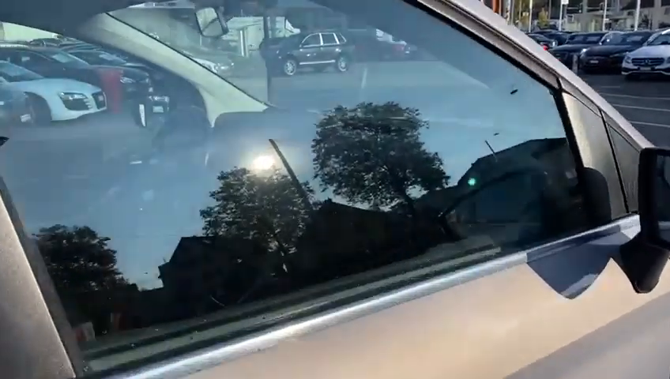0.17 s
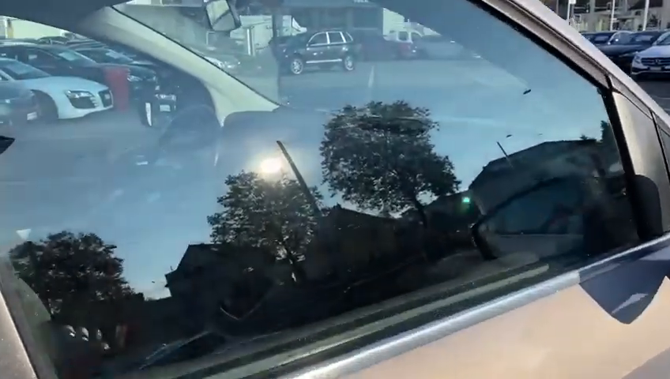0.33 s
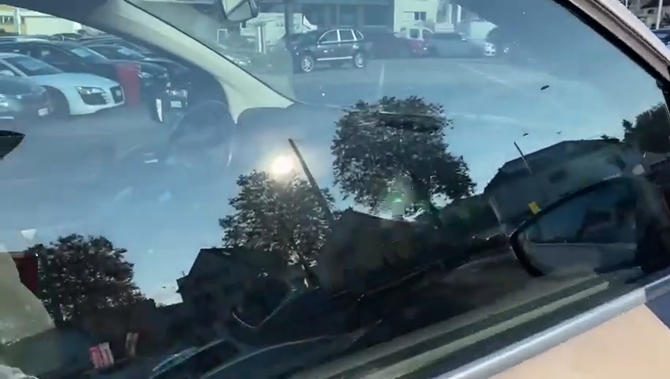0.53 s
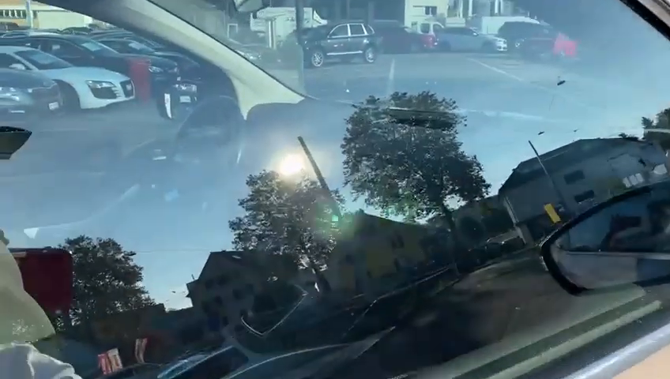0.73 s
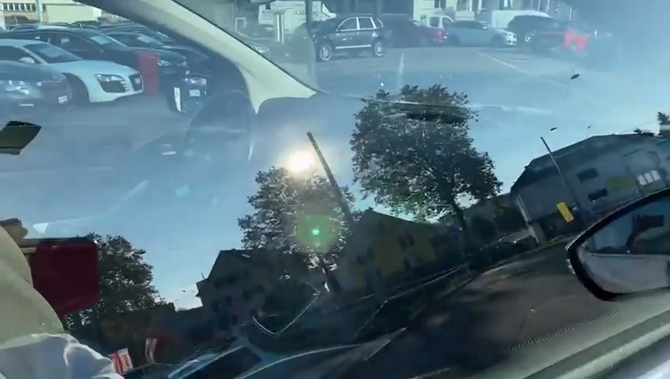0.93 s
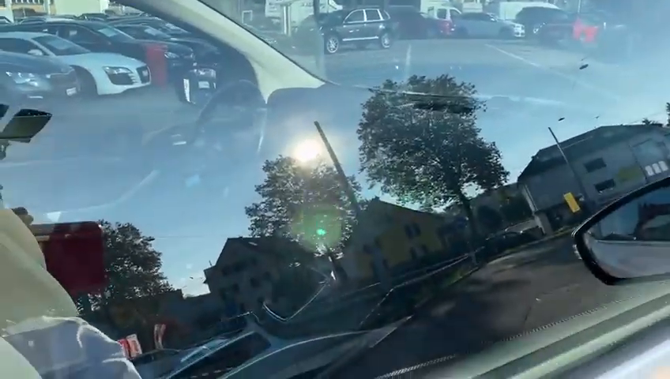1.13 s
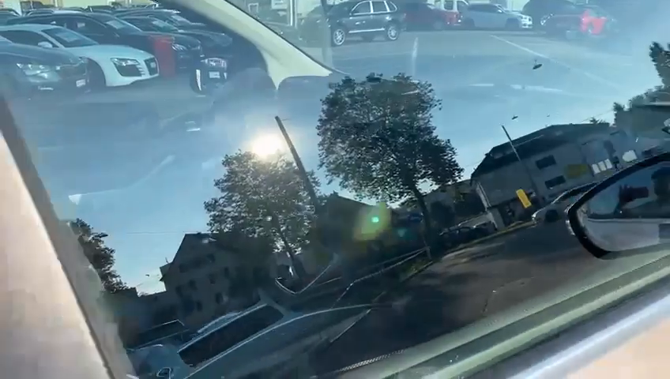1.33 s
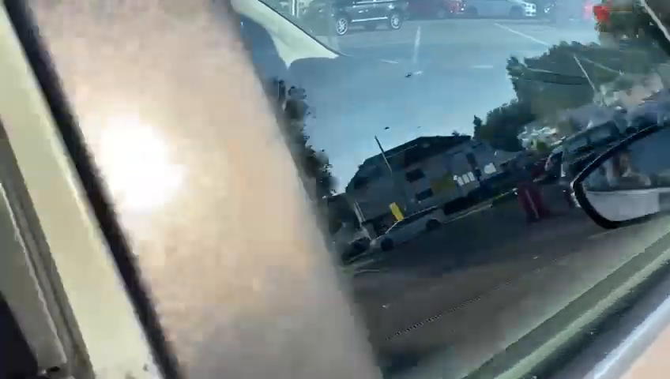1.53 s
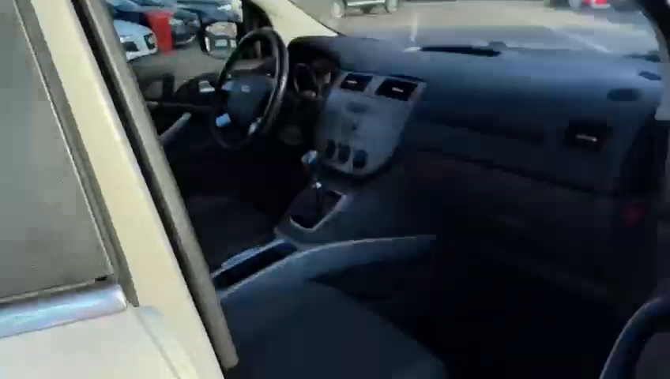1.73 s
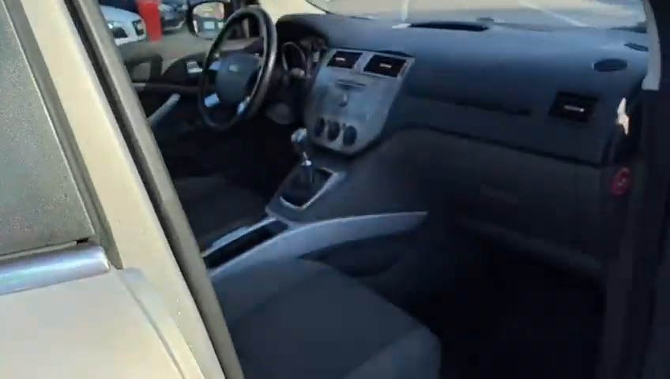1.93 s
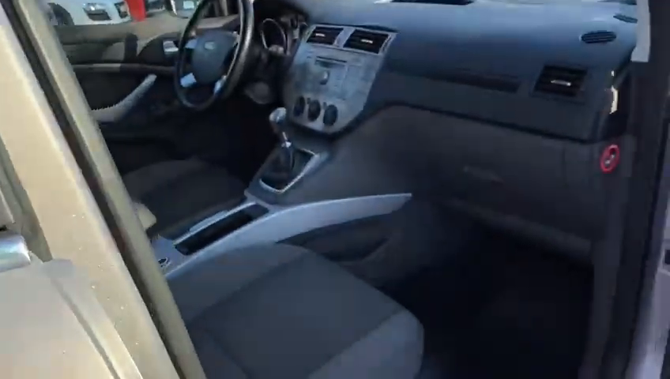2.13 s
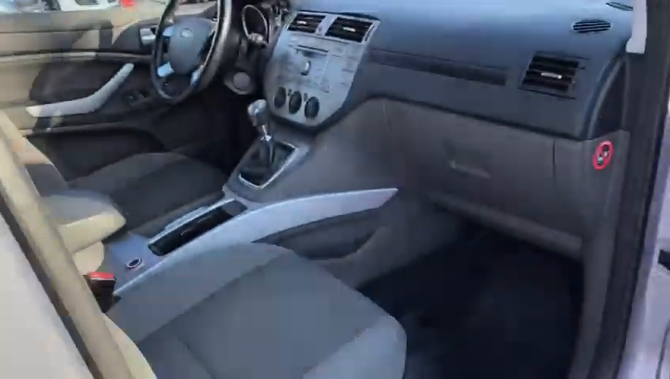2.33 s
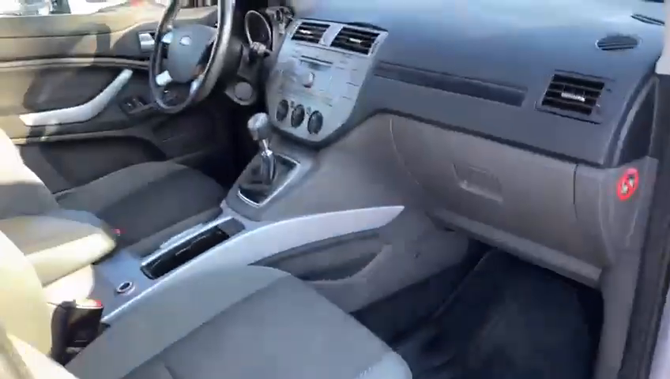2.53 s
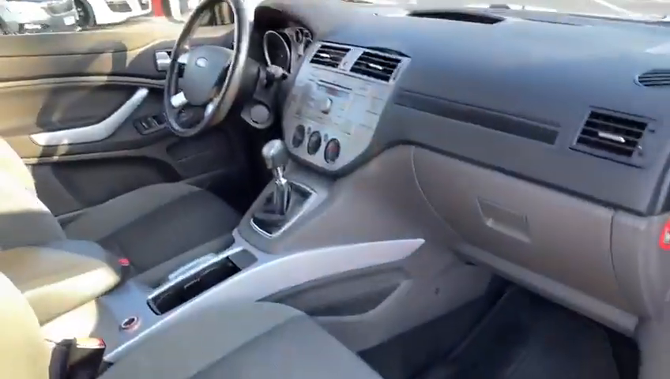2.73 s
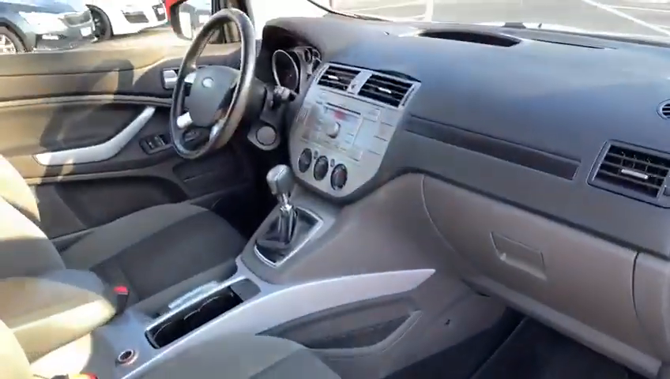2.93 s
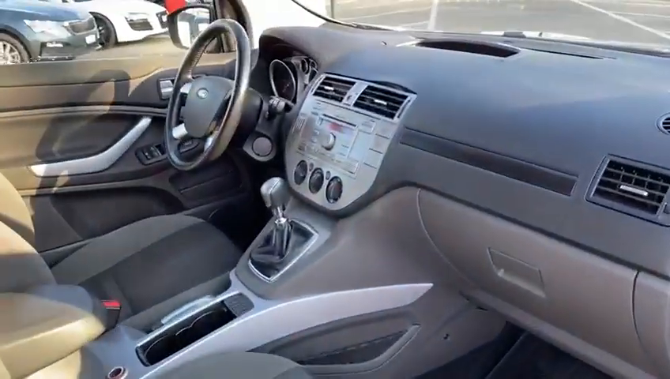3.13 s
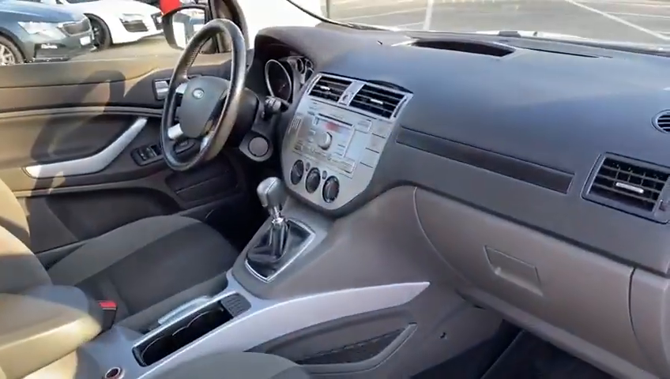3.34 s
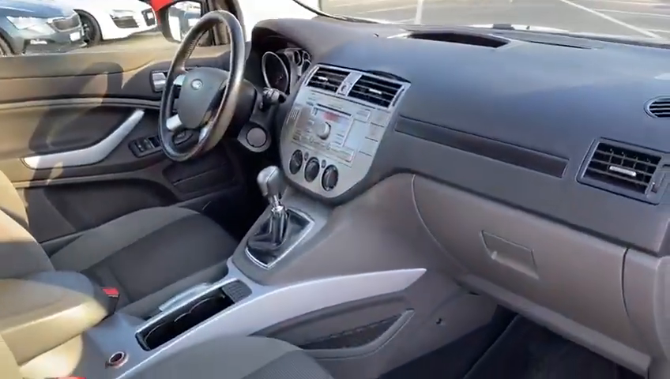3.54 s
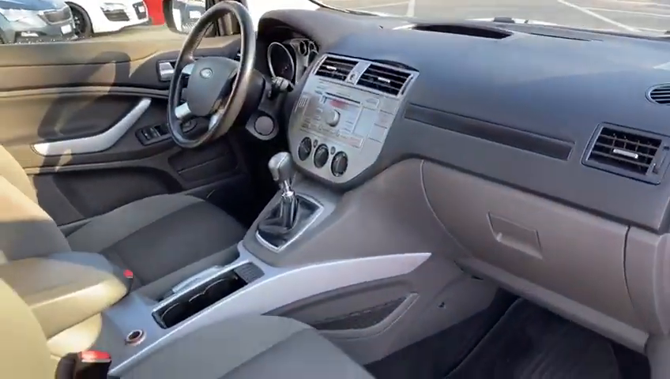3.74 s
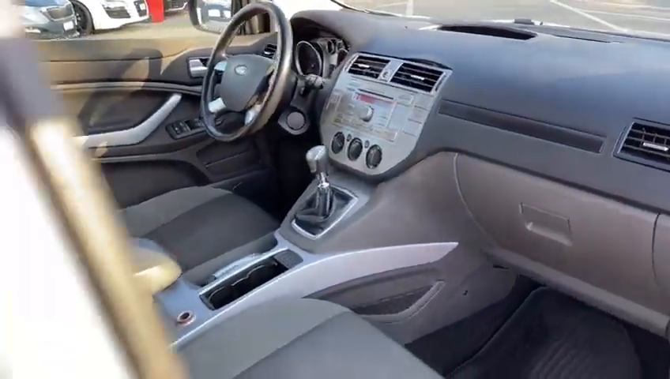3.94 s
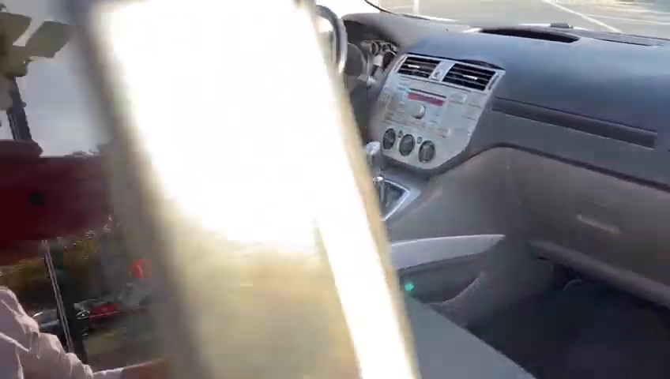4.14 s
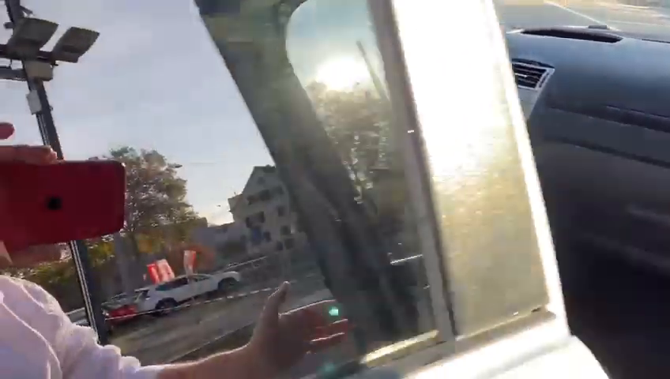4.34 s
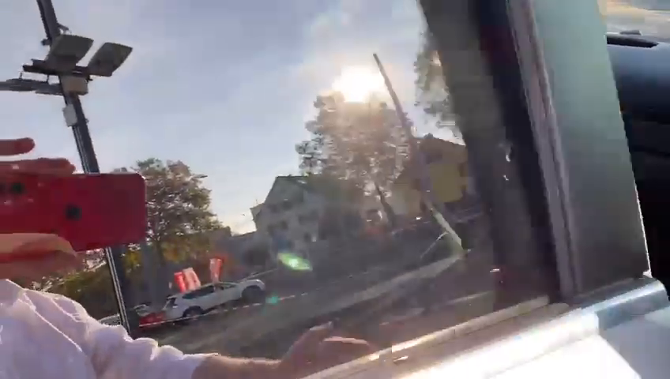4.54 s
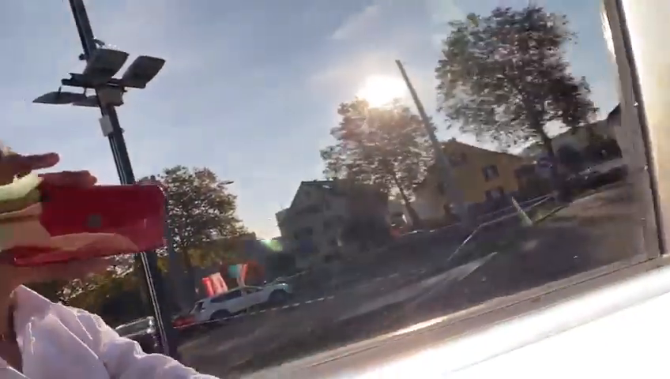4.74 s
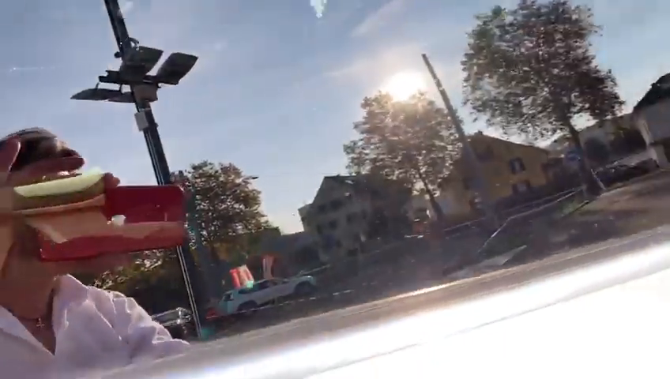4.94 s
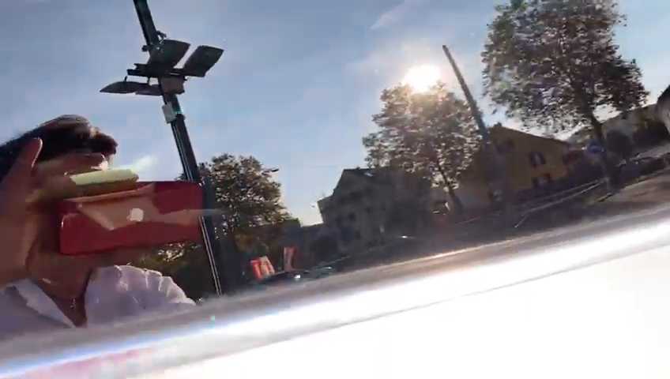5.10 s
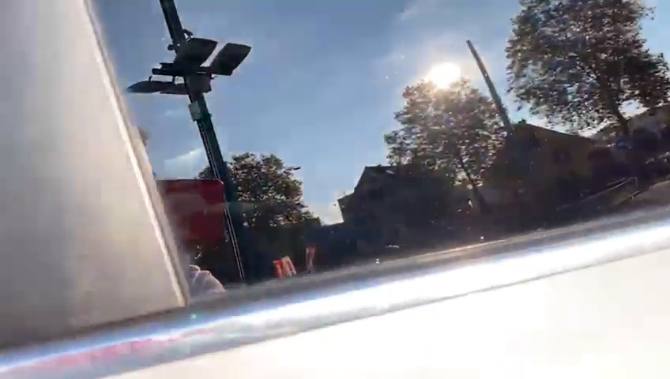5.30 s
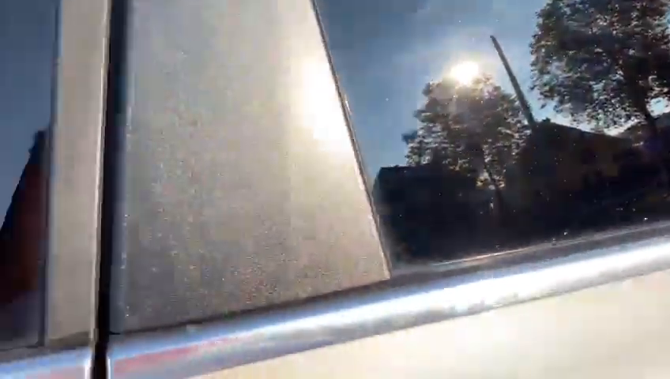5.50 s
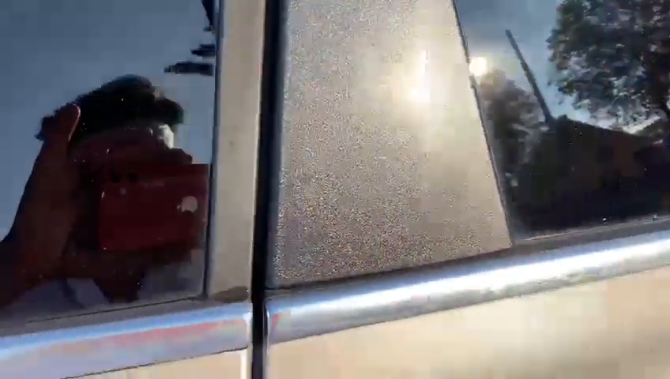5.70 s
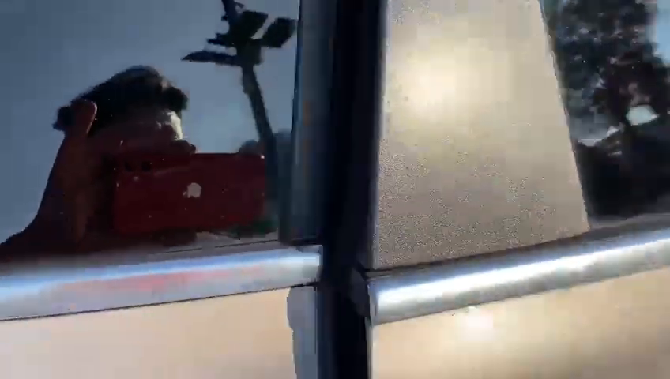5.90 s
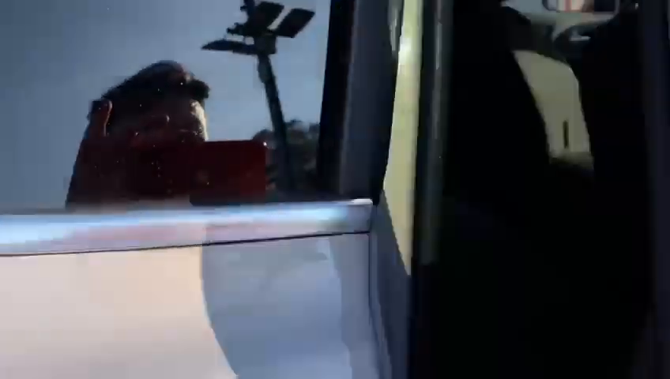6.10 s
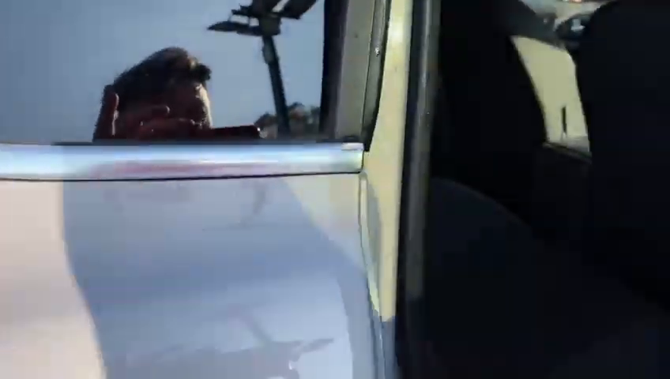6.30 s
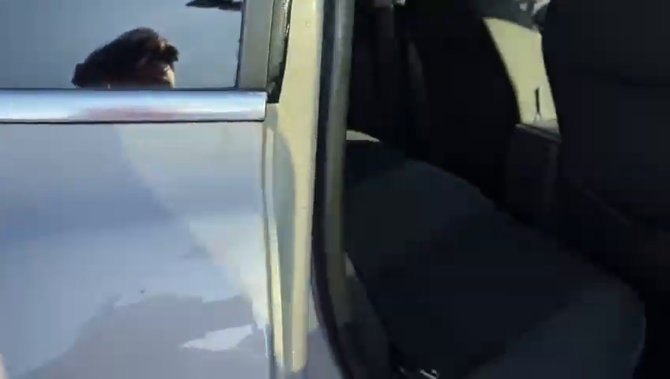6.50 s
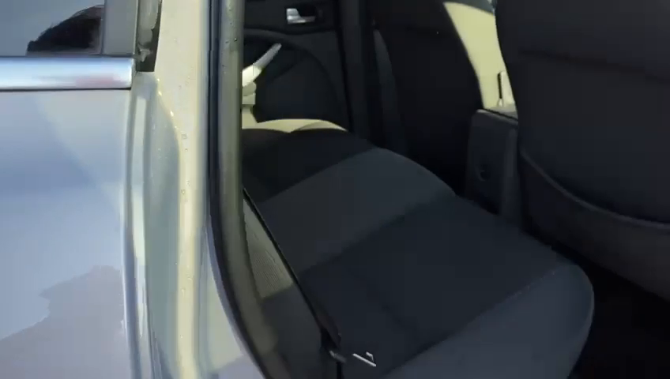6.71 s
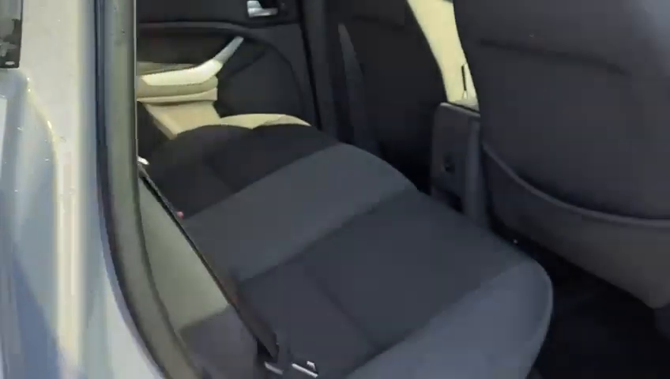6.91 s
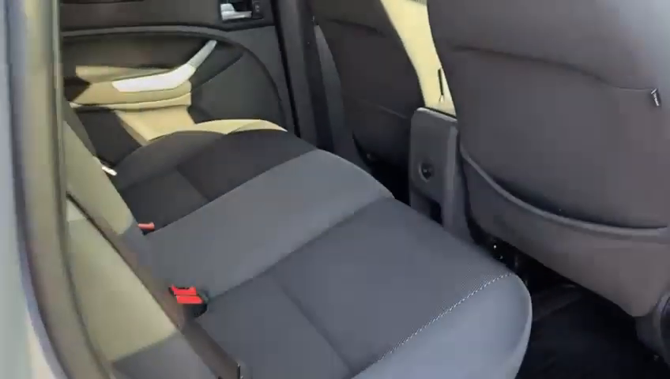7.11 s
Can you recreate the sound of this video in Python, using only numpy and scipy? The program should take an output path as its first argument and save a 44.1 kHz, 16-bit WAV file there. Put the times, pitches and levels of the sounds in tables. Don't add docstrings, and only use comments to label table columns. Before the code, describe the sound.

A small handheld stereo microphone close to car doors in an open lot. Light plastic rattle, low unlatching thump, brief faint hinge groan and knocking stop; quiet traffic and tiny ticks; then one very loud metallic slam with hollow boom, followed by soft body thumps. A sharp rear latch clunk with rattling rods and a last resonant stop end it, with muffled road rumble underneath.

```python
import sys
import numpy as np
from scipy import signal
from scipy.fft import rfft, irfft, next_fast_len
from scipy.io import wavfile
from scipy.ndimage import uniform_filter1d

SR = 44100
rng = np.random.default_rng(int(sys.argv[2]) if len(sys.argv) > 2 else 0)


def int16_out(signal):
    q = np.round(np.clip(np.atleast_2d(signal).T, -1, 1) * 32767)
    wavfile.write(sys.argv[1], SR, q.astype(np.int16))


def convert_level_to_amplitude(level_db):
    exponent = np.asarray(level_db, float) / 20
    return 10 ** exponent


N = 319989


def evened(x):
    return x / np.sqrt(np.mean(x ** 2) + 1e-20)


def read(points, hz):
    f, value = np.transpose(points)
    return np.interp(np.log(hz + 1), np.log(f + 1), value)


def add(mix, s, sound):
    part = mix[:, round(s * SR):][:, :sound.shape[1]]
    part += sound[:, :part.shape[1]]


def colour(x, gain):
    size = next_fast_len(x.shape[-1])
    return irfft(rfft(x, size) * gain(np.fft.rfftfreq(size, 1 / SR)), size)[..., :x.shape[-1]]


def panned(x, db):
    return np.array([x * convert_level_to_amplitude(db / 2), x * convert_level_to_amplitude(-db / 2)])


def ports(x, lead, tilt):
    def half(hz):
        return np.exp(.5j * np.interp(hz, *np.transpose(lead))) * convert_level_to_amplitude(read(tilt, hz) / 2)
    return np.array([colour(x, half), colour(x, lambda hz: 1 / half(hz))])


def ring(x, hz, t60):
    r = 10 ** (-3 / (max(t60, .004) * SR))
    w = 2 * np.pi * hz / SR
    return np.sin(w) * signal.lfilter([1], [1, -2 * r * np.cos(w), r * r], x)


# frequency in Hz, left minus right in dB.
SLAM = [(4.611, -7.5, 2, -0.5, 0.33), (4.617, -4, -5, 2.5, 0.72), (4.624, -9, 1.5, -6.5, 1.6),
        (4.649, -4.5, -2.5, -2, 0.93), (4.689, -21, 1.5, -6, 1)]
SLAM_MODES = [(86, -9, 0.38), (160, -20, 0.24), (236, -14.5, 0.11), (361, -9, 0.11), (500, -18.5, 0.095),
              (655, -11, 0.072), (1096, -10.5, 0.039), (1430, -14, 0.065), (2010, -24, 0.042)]
SLAM_CLATTER = [(60, -22), (140, -8), (670, -20.5), (1450, -27), (2000, -24.5), (2500, -38.5), (4400, -38),
                (8000, -63)]
SLAM_KNOCKS = [(4.602, -30, 1400, .03), (4.607, -23, 900, .03), (4.613, -11, 577, 0.062),
               (4.615, -16, 1047, 0.052), (4.616, -32, 1430, 0.046), (4.619, -20, 3960, .012),
               (4.649, -18.5, 430, .07), (4.651, -24, 5300, 0.034), (4.654, -20, 684, 0.089),
               (4.667, -25, 1350, .05), (4.657, -35, 4360, .03), (4.662, -31, 3540, 0.033),
               (4.673, -36, 3100, .03), (4.683, -42, 3420, 0.027), (4.694, -45, 4340, 0.018)]
FRONT_LEAD = [(0, 1), (300, -1), (1000, -0.96), (2500, -3), (4000, -6), (8000, -9)]
FRONT_TILT = [(60, 0), (500, -1.2), (2000, -0.34), (5000, 0.33)]


def front_door_slam():
    return door(SLAM, SLAM_MODES, SLAM_CLATTER, FRONT_LEAD, FRONT_TILT, SLAM_KNOCKS)


PULL = [(1.105, -20, 3.5, 1, 0.85), (1.116, -12, -9, 9, 0.29), (1.145, -30.5, 6.5, -7, 0.71),
        (1.176, -17, -6.5, -8, 0.6)]
PULL_MODES = [(60, -14, 0.13), (101, -4, 0.49), (130, -1.5, 0.43), (171, -11, 0.18), (200, -11, 0.22),
              (256, -22, 0.22), (343, -14, 0.13)]
PULL_CLATTER = [(29, -43), (50, -4), (125, 0.5), (246, -1.5), (465, -15.5), (575, -19), (8000, -86)]
HANDLE_KNOCKS = [(.399, -38, 1900, .02), (.4045, -34, 2950, .03), (.411, -37, 2700, .02),
                 (.412, -41, 5000, .02), (.417, -30, 950, .04), (.419, -37, 2600, .015),
                 (.4335, -39, 2100, .015)]
PULL_KNOCKS = [(1.074, -41, 1900, .02), (1.0745, -38, 5200, .025), (1.117, -40, 3000, .015),
               (1.118, -22.5, 167, 0.054), (1.122, -16, 150, .06), (1.146, -16.5, 126, 0.083),
               (1.178, -20.5, 130, .06), (1.216, -25, 139, .05)]
STOP_LEAD = [(0, 0), (500, -1.5), (2760, -1), (7000, -4)]
STOP_TILT = [(60, 1), (850, -4.5), (3200, 4.5)]


def front_door_pull():
    return door(PULL, PULL_MODES, PULL_CLATTER, STOP_LEAD, STOP_TILT, HANDLE_KNOCKS + PULL_KNOCKS)


STOP = [(1.865, -31.5, 10, 3, 1.2), (1.877, -10, -7, 2, 0.89), (1.889, -17.5, -2.5, -4, 1.46)]
STOP_MODES = [(151, -12, 0.11), (191, -4, 0.23), (253, 1.5, 0.2), (349.6, -14, 0.88), (455, -3.5, 0.17),
              (579, -9, 0.13), (793, 0, 0.054), (937, 4.5, 0.092), (2000, 3.5, 0.013)]
STOP_CLATTER = [(47, -60), (80, -14), (226, -11), (679, -14), (942, -20), (1650, -34), (1920, -68),
                (8000, -53)]
STOP_KNOCKS = [(1.869, -34, 340, 0.022), (1.88, -31, 1200, .04), (1.884, -33, 1500, 0.033),
               (1.925, -25, 240, 0.054), (1.93, -36, 1100, .04), (1.972, -27.5, 398, 0.078),
               (1.993, -29, 330, 0.027), (2.021, -25.5, 105, 0.1)]


def front_door_stop():
    return door(STOP, STOP_MODES, STOP_CLATTER, STOP_LEAD, STOP_TILT, STOP_KNOCKS)


REAR_PULL = [(5.754, -4, -6, -3, 0.92), (5.763, -16, 2, -6.5, 0.94), (5.812, -29, -6, 0, 0.8),
             (5.841, -26, -3.5, 4.5, 0.84)]
REAR_PULL_MODES = [(75, -8.5, 0.099), (127, 2.5, 0.22), (159.6, -3, 0.42), (253.5, -13.5, 1),
                   (374, 4, 0.125), (498, 3, 0.14), (646, 8.5, 0.048), (800, -3, 0.019),
                   (1122, -0.5, 0.074), (1580, -10.5, 0.13)]
REAR_PULL_CLATTER = [(35, -43), (60, -12), (241, -10.5), (465, -10), (570, -24), (808, 0), (895, -16.5),
                     (8000, -80)]
REAR_PULL_KNOCKS = [(5.7043, -17.5, 710, 0.014), (5.714, -24.5, 650, .03), (5.725, -33, 820, 0.038),
                    (5.741, -29, 746, 0.023), (5.747, -21.5, 500, 0.022), (5.763, -28.5, 1880, .03),
                    (5.771, -26, 1520, .04), (5.786, -33, 1600, 0.044), (5.797, -34, 1410, .03),
                    (5.812, -26, 1090, 0.034), (5.841, -28, 1390, 0.025), (5.848, -27, 826, 0.04),
                    (5.854, -31, 1130, .03), (5.692, -36, 1105, 0.033), (5.774, -44, 2500, .02),
                    (5.812, -41, 2100, .03), (5.815, -41, 3320, .03), (5.844, -36, 2200, .02)]
REAR_LEAD = [(0, 0.15), (500, 1), (1800, 1.5), (7600, 1.4)]
REAR_TILT = [(60, -2.5), (850, 3.5), (3200, 3)]


def rear_door_pull():
    return door(REAR_PULL, REAR_PULL_MODES, REAR_PULL_CLATTER, REAR_LEAD, REAR_TILT, REAR_PULL_KNOCKS)


REAR_STOP = [(6.431, -32, 14, -5, 1), (6.451, -18, 3, 6, 0.46), (6.462, -11, 1.2, -0.9, 1)]
REAR_STOP_MODES = [(145.4, -1, 0.31), (213, 0, 0.42), (239.8, 6.5, 0.19), (288, -11.5, 0.69),
                   (510, -1, 0.15), (668, -3, 0.12), (957, -4, 0.079)]
REAR_STOP_CLATTER = [(35, -54), (60, -8.5), (227, 1), (349, -8.5), (632, -12.5), (1350, -24.5),
                     (1590, -29.5), (8000, -69)]
REAR_STOP_KNOCKS = [(6.437, -36, 980, .03), (6.45, -23, 1330, 0.091), (6.457, -31, 3140, .02),
                    (6.458, -18, 900, .05), (6.463, -28, 1700, 0.028), (6.468, -33, 2200, .025),
                    (6.478, -30, 1350, .04), (6.49, -37, 1190, .04), (6.487, -17.5, 216, 0.21),
                    (6.452, -19, 560, .05), (6.462, -24.5, 518, .08), (6.474, -23, 590, 0.061),
                    (6.516, -34, 200, .08), (6.468, -17, 532, .08), (6.482, -23, 558, .07),
                    (6.495, -33, 513, .07)]
OPEN_LEAD = [(0, 0), (500, -2), (2900, -1.5), (7500, -2)]
OPEN_TILT = [(60, -4.5), (850, -2.5), (3200, -2)]


def rear_door_stop():
    return door(REAR_STOP, REAR_STOP_MODES, REAR_STOP_CLATTER, OPEN_LEAD, OPEN_TILT, REAR_STOP_KNOCKS)


def door(blows, modes, clatter, lead, tilt, knocks):
    out = np.zeros((1, N))
    for s, db, *how in blows:
        add(out, s, convert_level_to_amplitude(db) * blow(modes, clatter, *how)[None])
    for s, db, hz, t60 in knocks:
        add(out, s, thump(db, hz, 0, t60)[:1])
    return ports(out[0], lead, tilt)


# frequency in Hz, t60 in seconds.
CLATTER_T60 = [(50, 0.75), (130, 0.28), (400, 0.26), (1000, 0.14), (2500, 0.067), (6000, 0.15),
               (11000, 0.061)]


def blow(modes, clatter, clatter_db, bright_db, ring_factor):
    t = np.arange(SR // 2 + SR // 4) / SR
    push_ms = 3.2 * ring_factor ** 2
    hz, db, t60 = np.transpose(modes)[:, :, None]
    detune, phase = rng.random((len(modes), 2)).T[:, :, None]
    build = 1 - np.exp(-t / (push_ms / 2500 + 0.34 / hz))
    level = convert_level_to_amplitude(db + bright_db * np.log2(hz / 300) - 60 * t / (t60 * ring_factor))
    wave = np.sin(2 * np.pi * (hz * (.985 + 0.027 * detune) * t + phase))
    panel = (build * level * wave).sum(axis=0)

    def clatter_gain(f):
        return convert_level_to_amplitude(read(clatter, np.minimum(f, 7500)) + bright_db * np.log2((f + 20) / 300))
    noise = colour(rng.standard_normal(len(t)), clatter_gain)
    noise *= convert_level_to_amplitude(1.8 * evened(uniform_filter1d(rng.standard_normal(len(t)), size=130)))
    rattle = np.zeros(len(t))
    for hz, t60 in CLATTER_T60:
        share = [(f, float(f == hz)) for f, _ in CLATTER_T60]
        decay = convert_level_to_amplitude(-60 * t / (t60 * ring_factor + push_ms / 400))
        swell = (1 - np.exp(-t * hz / 1.9)) * decay
        rattle += colour(noise, lambda f: read(share, f)) * swell / np.sqrt(t60)
    sound = 0.062 * evened(panel) * np.sqrt(ring_factor)
    sound = sound + convert_level_to_amplitude(clatter_db) * rattle / abs(rattle).max()
    return sound * np.clip((t[-1] - t) * 10, 0, 1)


# start in seconds, peak in dB, pitch in Hz, left minus right in dB, t60 in seconds.
BOOMS = [(4.620, -4.5, 130.3, -1, 0.16), (4.646, -4.5, 53.9, -1.5, 0.23), (4.645, -6.5, 129.7, -0.5, 0.29)]


def cabin_booms(mix):
    for s, *how in BOOMS:
        add(mix, s, thump(*how))


# start in seconds, peak in dB, pitch in Hz, left minus right in dB.
THUMPS = [(0.778, -31, 151, 0), (4.064, -14.5, 290, -5), (4.075, -23.5, 160, 4), (4.095, -30, 116, 4),
          (4.447, -34, 200, 1), (4.574, -26, 224, 0), (4.812, -26, 80.4, -1), (4.876, -16, 229, 3),
          (4.92, -20, 225, 3.5), (4.95, -13.5, 63.7, 3), (4.975, -8, 312, 6), (4.979, -7.5, 138.8, 2),
          (4.999, -16, 168, 7), (4.933, -15.5, 71, 5), (5.135, -21, 130, -2.5), (5.43, -15, 75, 2),
          (6.689, -26, 104, -6)]


def body_thumps(mix):
    for s, db, hz, pan_db in THUMPS:
        add(mix, s, thump(db, hz, pan_db, 8.6 / hz))


def thump(db, hz, pan_db, t60):
    t = np.arange(SR // 4) / SR
    push = (t * hz) ** 2 * np.exp(-t * hz * 5.2) * np.cos(2 * np.pi * hz * t)
    sound = ring(push, hz, t60)
    sound = sound + 0.41 * ring(push, hz * 1.344, t60 * 1.45)
    sound = sound + .5 * ring(push, hz * 0.68, t60 * 0.18)
    return panned(convert_level_to_amplitude(db) * sound / abs(sound).max(), pan_db)


# start in seconds, peak in dB, pitch in Hz, left minus right in dB, t60 in seconds.
STRIKER = [(4.611, -11, 5350, -2, 0.018), (4.6177, -5.5, 4270, 4.5, 0.011), (4.6485, -18, 5110, 2, 0.047)]
CLACKS = [(.404, -35, 2970, -2, 0.08), (.417, -31, 945, -2, 0.046), (0.432, -37, 2300, -4, 0.035),
          (0.683, -29.5, 1290, -6, 0.023), (2.396, -47.5, 10700, -2, 0.026), (2.835, -42, 10550, 0, 0.075),
          (4.065, -37.5, 10000, 2, 0.05), (4.613, -39, 2940, 4, .03), (5.705, -35, 1480, 1, 0.03),
          (5.76, -27.5, 1690, -3, 0.075)]
MORE_CONTACTS = [(0.678, -42, 6000, 2, .015), (2.61, -54, 6000, -3, .04), (3.835, -59, 10500, 0, 0.087),
                 (.398, -42, 2000, 1, .03), (.408, -34, 2900, 1, .02), (.425, -37, 2600, 1, .02),
                 (0.435, -46, 1500, 1, .02), (6.457, -28, 2300, -2, .04), (6.705, -40, 2420, -2, .03),
                 (6.845, -49, 10800, -2, .04), (6.884, -52, 10500, -2, .04), (1.85, -44, 7000, 4, .03),
                 (1.8635, -40, 5500, 4, .015), (1.868, -27, 10500, 2, .015), (1.8778, -26.5, 7170, -1, .025),
                 (1.8785, -29, 11000, 4, .02), (4.6172, -24, 11100, 2, .012), (6.4415, -41, 7000, -4, .015),
                 (1.122, -36, 7600, 2, .015), (1.142, -37, 7000, 2, .02)]
# start in seconds, peak in dB, pitch in Hz, left minus right in dB.
TICKS = [(.378, -45, 5200, 12), (0.683, -33.5, 5030, 3), (1.074, -39, 5270, 2), (1.8164, -49, 3660, 5),
         (1.874, -36.5, 3710, 25), (4.067, -42, 4600, -1), (4.268, -49, 4720, 7), (4.683, -35.5, 3440, 4),
         (4.792, -40.5, 4340, -3), (5.17, -45.5, 5000, 4.5), (5.7045, -36.5, 7500, -3),
         (5.793, -35.5, 7150, -2), (5.813, -36.5, 4140, 2), (6.45, -32, 6060, -6), (6.451, -28, 3100, 3),
         (6.788, -42.5, 3700, -4)]


def hard_contacts(mix):
    for s, *how in STRIKER + CLACKS + MORE_CONTACTS:
        add(mix, s, tick(*how))
    for s, *how in TICKS:
        add(mix, s, tick(*how, t60=0.051))


def tick(db, hz, pan_db, t60):
    t = np.arange(SR // 8) / SR
    noise = rng.standard_normal((2, len(t)))
    noise = noise[0] + 1.55 * noise
    bright = 0.6 * (hz / 5000) ** 2 / (1 + (hz / 5000) ** 2)

    def crack_gain(f):
        return bright * f / (f + 1000) + 1 / (1 + ((f - hz * 0.97) / (hz * 0.5)) ** 2)
    crack = colour(noise, crack_gain)
    crack = crack * convert_level_to_amplitude(-60 * t / max(t60, .004)) * (1 - np.exp(-t / 0.0017))
    sound = evened(crack) + 0.45 * evened(ring(noise * np.exp(-t / 0.0023), hz, t60 * .5))
    return convert_level_to_amplitude(db + np.array([[pan_db / 2], [-pan_db / 2]])) * sound / abs(sound).max()


# loudest at seconds, rise in seconds, fall in seconds, level in dB, brightness in dB.
SCUFFS = [(.415, 0.054, 0.048, -45.5, -6.5), (1.078, 0.041, 0.045, -48.5, -7),
          (1.125, 0.039, 0.052, -43, 4), (1.451, 0.13, 0.14, -59.5, -9), (1.847, 0.024, 0.066, -50.5, -4),
          (1.879, .02, .06, -40, 0), (2.55, 0.069, 0.075, -59.5, 14), (4.11, 0.041, 0.071, -56.5, -6),
          (4.17, 0.047, 0.065, -56, -8.5), (4.28, .025, .025, -49, 12), (4.61, .04, .008, -47, -10),
          (4.624, 0.0069, 0.054, -40.5, -12), (4.769, .06, 0.11, -54, -6.5), (5.211, 0.058, 0.046, -46, -3),
          (5.69, 0.043, 0.11, -49, 17), (5.771, 0.071, 0.056, -55, 0), (6.454, 0.058, 0.033, -43.5, 0),
          (6.675, 0.14, 0.024, -58.5, 3), (6.72, 0.034, 0.042, -63, -16), (6.77, 0.051, 0.1, -58, -11)]
# frequency in Hz, level in dB per Hz.
SCUFF = [(350, -5.5), (900, -8), (1600, -8.5), (2800, -10), (3300, -17.5), (5000, -14.5), (8000, -15.5),
         (12000, -17)]


def scuff(s, rise_s, fall_s, db, bright_db):
    t = np.arange(-rise_s, fall_s, 1 / SR)
    noise = rng.standard_normal((SR // 2, 3)).T[:, :len(t)]
    slips = convert_level_to_amplitude(2.6 * evened(uniform_filter1d(noise[2], size=70)))
    hiss = evened(colour((noise[0] + noise[:2]) * slips, lambda f: convert_level_to_amplitude(read(SCUFF, f))))
    dull = colour(hiss, lambda f: 1 / (1 + (f / 2800) ** 4))
    hiss = dull * convert_level_to_amplitude(-bright_db) + hiss - dull
    stroke_db = -22.5 * np.maximum(-t / rise_s, t / fall_s) ** 1.9
    return s - rise_s, hiss * convert_level_to_amplitude(db + stroke_db) * signal.windows.tukey(len(t), .35)


# from seconds, to seconds, first Hz, last Hz, level in dB.
HINGE = [(1.342, 1.502, 930, 900, -53.5), (1.394, 1.5, 387, 388, -45.5)]
DRONES = [(0, 1.447, 139.5, 141.5, -44), (0.903, 2.345, 343, 340.3, -55.5), (1.347, 2.056, 71, 71.7, -42.5),
          (2.105, 2.96, 73.5, 79.7, -40), (2.804, 4.663, 82, 99.94, -39), (5.796, 7.255, 74, 71.44, -40)]
# from seconds, to seconds, first Hz, last Hz, level in dB, width in Hz.
TYRES = [(5.4, 6.45, 780, 600, -53.5, 180), (2.5, 4.3, 750, 900, -59.5, 350),
         (.8, 1.34, 720, 720, -52.5, 110)]


def hinge_engines_and_tyres(mix):
    for row in HINGE + DRONES:
        add(mix, *drone(*row))
    for row in TYRES:
        add(mix, *drone(*row, steady=0))


def drone(start, end, from_hz, to_hz, db, width_hz=13.8, steady=0.56):
    t = np.arange(start, end, 1 / SR)
    r = np.exp(-np.pi * width_hz / SR)
    noise = rng.standard_normal((2 * SR, 2)).T[:, :len(t)]
    a, b = signal.lfilter([1], [1, -2 * r, r * r], noise)
    turns = np.cumsum(np.linspace(from_hz, to_hz, len(t))) / SR
    tone = (evened(a) + 1j * evened(b) + steady) * np.exp(2j * np.pi * turns)
    return start, panned(evened(tone.real) * convert_level_to_amplitude(db) * signal.windows.tukey(len(t), .6), 0)


# time in seconds, level in dB.
TRAFFIC = [(0, 0), (.3, 1.5), (.6, 0.5), (1, 2), (1.4, 3.5), (1.8, .5), (2.2, -2.5), (2.6, -3.5),
           (3.3, -3.5), (4.1, -1), (4.55, 1), (5.1, 0.5), (5.4, 0.5), (5.7, 4), (6.1, 1.5), (6.4, -2.5),
           (6.75, -3.5), (7.26, -6)]
# frequency in Hz, level in dB per Hz.
RUMBLE = [(30, -30), (45, 7.5), (65, 0), (100, -2.5), (150, -10.5), (220, -19), (320, -31.5), (500, -71.5)]
ROAR = [(90, -30.5), (160, -8.5), (900, -11.5), (1200, -17), (1900, -20.5), (2750, -26.5), (3050, -32),
        (4500, -47.5)]
HISS = [(2900, -39), (3300, -15), (4300, 1.5), (5000, -5), (5800, -11.5), (7600, -12.5), (10500, -15.5),
        (12000, -38)]
# usual level in dB, and dB per dB of swell.
LAYERS_DB = (-37, -45.5, -71)
FOLLOW = (0.18, 0.98, 0.22)
# frequency in Hz, correlation from -1 to 1.
SAME = [(60, 0.98), (150, 0.79), (350, 0.093), (850, -0.39), (2060, 0.14), (4990, 0.72), (12100, -0.57)]
# time in seconds, peak in dB.
ROCKING = [(1.0, -40), (4.78, -27), (5.4, -31.5), (6.4, -33.5)]
# from seconds, to seconds, hiss loss in dB, rumble loss in dB.
SHELTER = [(1.95, 2.6, 4, 0), (2.65, 3.95, 10, -0.5), (5.897, 6.343, 1, 7.5), (7.002, 7.6, 6, 5)]


def traffic():
    frames, hz = N // 512 + 5, np.fft.rfftfreq(2048, 1 / SR)
    a, b, c, d, patches = rng.standard_normal((frames, len(hz), 5)).T
    patches = uniform_filter1d(patches, size=14, axis=0)
    patches = evened(uniform_filter1d(patches, size=9, axis=1))
    same = np.clip(read(SAME, hz), -1, 1)[:, None]
    left = a + 1j * b
    right = same * left + np.sqrt(1 - same ** 2) * (c + 1j * d)
    z = np.array([left, right])
    t = np.arange(N) / SR
    swell_db = np.interp(t, *np.transpose(TRAFFIC))
    rumble, roar, hiss = (convert_level_to_amplitude(db + share * swell_db) for db, share in zip(LAYERS_DB, FOLLOW))
    for s, db in ROCKING:
        rumble = rumble + convert_level_to_amplitude(db - np.maximum(76 * (s - t), 44 * (t - s)))
    lean_s = 0.33
    for start, end, hiss_db, rumble_db in SHELTER:
        shaded = np.clip(.5 + np.minimum(t - start, end - t) / lean_s, 0, 1)
        hiss = hiss / convert_level_to_amplitude(hiss_db * shaded)
        rumble = rumble / convert_level_to_amplitude(rumble_db * shaded)
    out = np.zeros((2, N))
    for shape, level, patchy_db in zip((RUMBLE, ROAR, HISS), (rumble, roar, hiss), (2.5, 1.5, 1.6)):
        spectrum = z * convert_level_to_amplitude(read(shape, hz)[:, None] + patchy_db * patches)
        layer = signal.istft(spectrum, nperseg=2048, noverlap=1536)[1]
        out += evened(layer[:, :N]) * level
    return out


def scene():
    mix = front_door_slam() + front_door_pull() + front_door_stop()
    mix += rear_door_pull() + rear_door_stop()
    cabin_booms(mix)
    body_thumps(mix)
    hard_contacts(mix)
    for row in SCUFFS:
        add(mix, *scuff(*row))
    hinge_engines_and_tyres(mix)
    return mix + traffic()


# frequency in Hz, gain in dB.
TREBLE = [(0, .5), (8250, -2.5), (8500, -18), (9550, -13), (10000, -5), (11600, -4.5), (12000, -34),
          (12600, -79)]
SIDE_TREBLE = [(0, .5), (4200, -0.5), (4800, -7.5), (5500, 2.5), (7000, -12), (8300, -0.5), (9800, -3.5),
               (12400, -38)]


def port_treble(left, right):
    mid = colour((left + right) / 2, lambda f: convert_level_to_amplitude(np.interp(f, *np.transpose(TREBLE))))
    side = colour((left - right) / 2, lambda f: convert_level_to_amplitude(np.interp(f, *np.transpose(SIDE_TREBLE))))
    return np.array([mid, side])


# frequency in Hz, level in dB per bin.
AUDIBLE = [(2900, -125), (3300, -102), (5900, -102), (7600, -103), (8350, -95), (9800, -95), (10100, -107),
           (12000, -108)]
SIDE_AUDIBLE = [(2300, -115), (3300, -96), (4700, -97), (5500, -103), (7000, -96), (8000, -111),
                (10100, -112), (10500, -97)]


def emptied(x):
    hz, _, z = signal.stft(x, SR, nperseg=1024)
    audible = np.array([read(AUDIBLE, hz), read(SIDE_AUDIBLE, hz)])[:, :, None]
    power = uniform_filter1d(uniform_filter1d(abs(z) ** 2, size=6, axis=1), size=4, axis=2)
    keep = np.clip((np.log10(abs(power) + 1e-20) * 10 - audible) / 2, .03, 1)
    narrow = uniform_filter1d(uniform_filter1d(abs(z[0]) ** 2, size=3, axis=0), size=5, axis=1)
    around = uniform_filter1d(narrow, size=15, axis=0)
    quiet = uniform_filter1d(around, size=5, axis=1) < 2.5 * np.median(around, axis=1, keepdims=True)
    hole = (narrow < around * convert_level_to_amplitude(2 * -3.6)) & quiet & (hz[:, None] > 1000)
    keep[0] *= np.where(hole, .1, 1)
    return signal.istft(z * keep, SR, nperseg=1024)[1][:, :N]


def band_limit(x):
    return signal.sosfilt(signal.butter(12, 12690, fs=SR, output="sos"), x)


def record(dry):
    mic = signal.sosfilt(signal.butter(4, 38.0, "high", fs=SR, output="sos"), dry)
    left, right = 1.05 * mic / (1 + (mic / .88) ** 4) ** .25
    mid, side = emptied(port_treble(left, right))
    return band_limit(np.array([mid + side, mid - side]))


dry = scene()
out = record(dry)
int16_out(out)
```